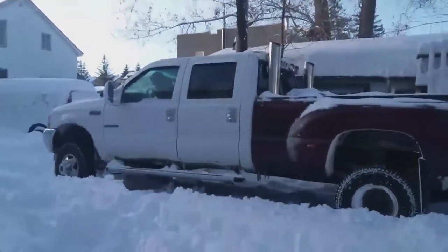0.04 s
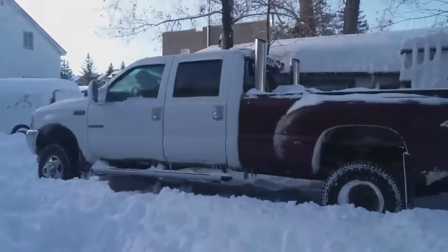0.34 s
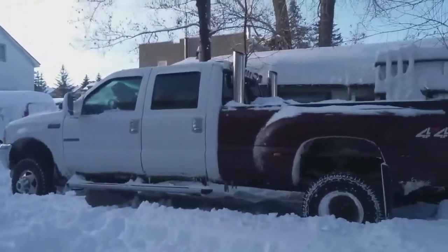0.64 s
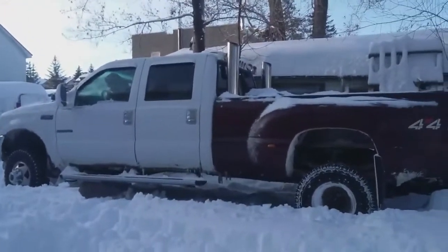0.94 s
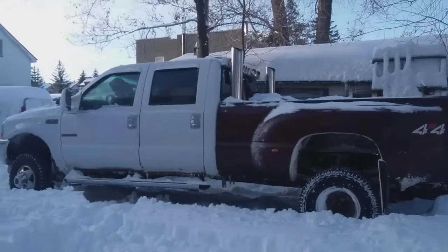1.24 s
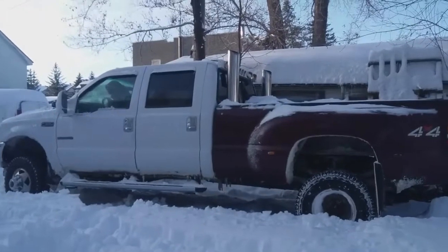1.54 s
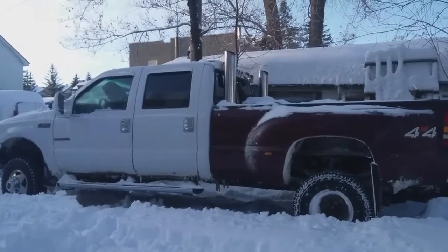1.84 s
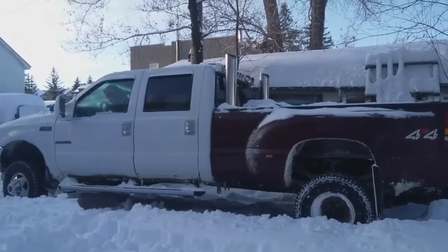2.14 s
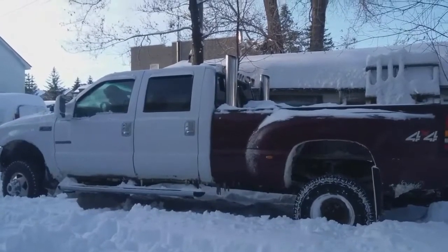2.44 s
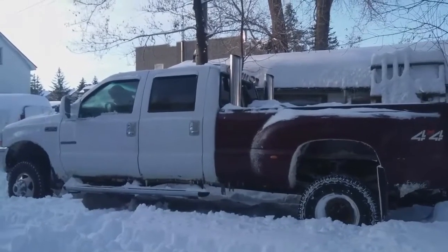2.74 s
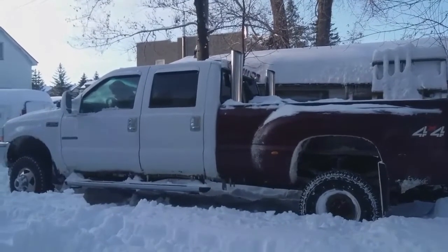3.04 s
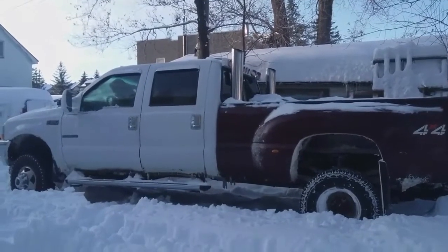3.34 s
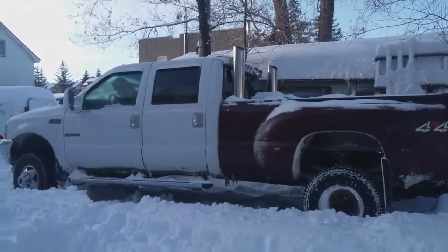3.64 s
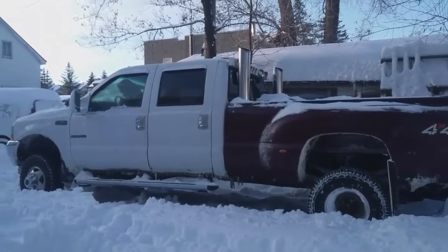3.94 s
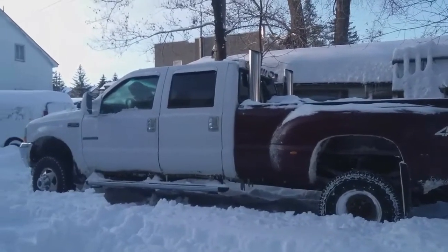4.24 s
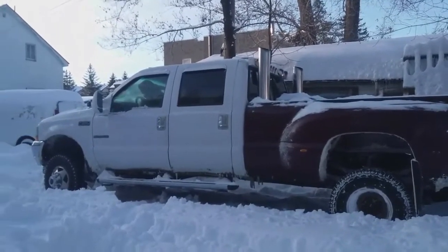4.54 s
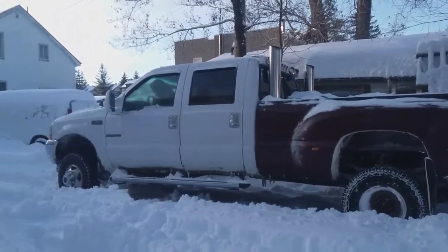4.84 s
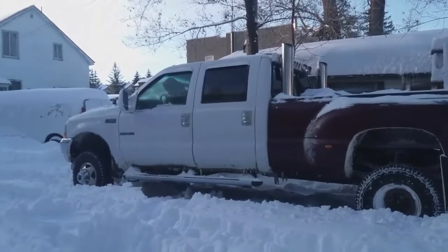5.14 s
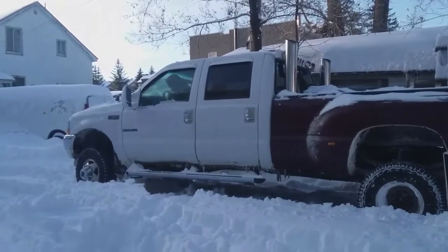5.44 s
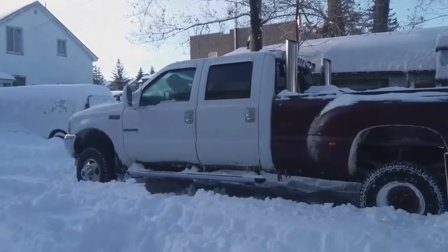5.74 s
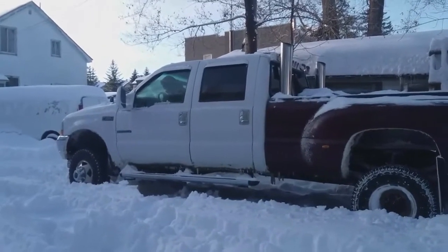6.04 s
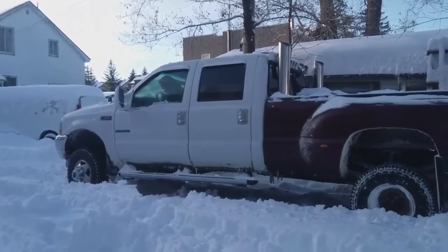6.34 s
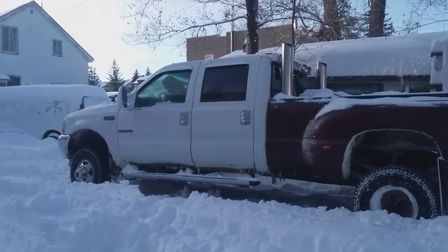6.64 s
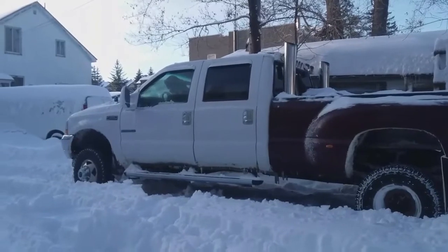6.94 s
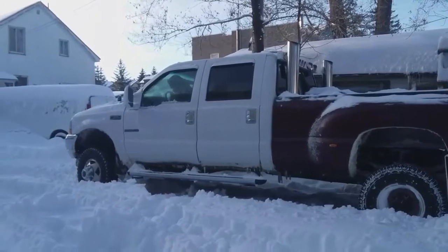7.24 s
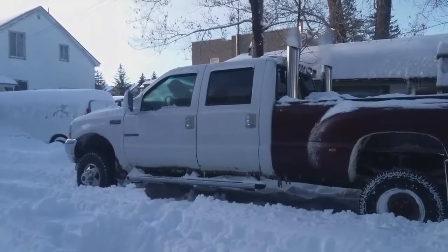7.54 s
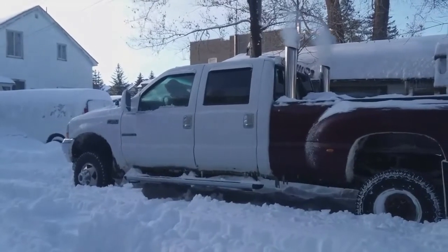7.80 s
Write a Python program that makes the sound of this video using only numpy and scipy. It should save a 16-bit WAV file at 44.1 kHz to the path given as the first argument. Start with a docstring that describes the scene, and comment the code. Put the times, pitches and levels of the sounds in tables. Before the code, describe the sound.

A cold diesel truck's starter labours and knocks for five seconds before the engine fires, booms briefly and dies.

```python
"""Cold diesel false start

A V8 diesel pickup with open exhaust stacks is cranked in a snowy yard. The starter's gear whine
sags on every compression while stray cylinders knock and rattle the block. After five seconds the
engine catches, surges twice with its firings booming through the stacks, stumbles and stalls."""
import sys
import numpy as np
from scipy import signal
from scipy.fft import rfft, irfft
from scipy.io import wavfile
from scipy.ndimage import uniform_filter1d

SR = 44100
rng = np.random.default_rng(int(sys.argv[2]) if len(sys.argv) > 2 else 0)


def log_audio(samples):
    """Write samples as a 16-bit WAV file to the path given in sys.argv[1]."""
    # one column per channel
    frames = np.atleast_2d(samples).T
    # limit to full scale, then quantise
    limited = np.clip(frames, -1, 1)
    pcm = np.round(limited * 32767).astype(np.int16)
    wavfile.write(sys.argv[1], SR, pcm)


N = 351468
T = np.arange(N) / SR
TAPS = 8192  # length of the impulse responses
CATCH_S = 5.42  # the engine takes over from the starter

# tone colours of winter air, gears, loose metal, combustion and gas: (frequency [Hz], level [dB])
AIR_SPECTRUM = [(25, -13), (70, 4), (350, -12.5), (800, -14.5), (1000, -8), (1300, -19.5), (2600, -17.5),
                (5000, -26), (6350, -16.5), (7700, -32.5), (13000, -32)]
RASP_SPECTRUM = [(100, -39.5), (280, -1), (600, -2), (1050, -2.5), (1300, -8), (2100, -16), (2650, -4.5),
                 (3300, -20), (4000, -16), (6600, -18.5), (8200, -34.5), (13000, -37)]
RATTLE_SPECTRUM = [(700, 10), (1400, -7), (1800, 7.5), (2600, 6.5), (3700, 2), (5300, 4), (6600, 2),
                   (8200, -14.5), (13000, -24.5)]
CLATTER_SPECTRUM = [(300, 7), (500, -3), (750, 10), (900, 6), (1080, -8), (1310, 5), (1600, -3.5),
                    (2200, -1.5), (2550, -8.5), (3100, -14.5), (9000, -35.5)]
HISS_SPECTRUM = [(1500, -2), (3000, -9.5), (3800, -2), (4500, -9), (5500, -0.5), (6500, 0), (7500, -13),
                 (9000, -22), (13000, -22.5)]
# resonances of starter housing, block, sump and stacks: (frequency [Hz], width [Hz], level [dB])
HOUSING_MODES = [(264.5, 51, 8), (472, 90, -6.5), (886, 30, 10.5), (1071, 54, -2.5), (2010, 40, 10),
                 (2550, 380, -0.5)]
BLOCK_MODES = [(709, 52, 9.9), (831, 15, 12), (895, 27, 14.7), (1078, 97, 6.3)]
SUMP_MODES = [(180, 60, -5.5), (297.7, 20, 2.5), (372, 32, 4), (462.5, 10.5, 6)]
STACK_MODES = [(57, 23, 5), (78.3, 61, 9), (96.2, 53, 4.5), (168.7, 6.7, 4.5), (232.4, 5.8, -1.5),
               (309.5, 21.4, -4.5), (339, 19.6, -2.5)]
# short rings of brackets, clutch and block: (frequency [Hz], pitch scatter [share], level [dB])
BRACKET_RINGS = [(1492, 0.13, 10), (2613, 0.0605, 10.5), (5280, 0.071, 5.5), (6360, 0.038, 0)]
CLUTCH_RINGS = [(4210, 0.082, 1), (5100, 0.093, 0.12), (6600, 0.025, -3)]
CLACK_RINGS = [(781, 0.12, -1.5), (1333, 0.122, 0), (2538, 0.092, -4)]
# compressions that load the starter: (time [s], whine level [dB], growl level [dB])
STROKES = [(0.048, -47, -41), (0.146, -41, -38.5), (0.304, -41, -39.5), (0.835, -41, -38),
           (1.119, -39.5, -37.5), (1.266, -40.5, -41), (1.64, -40.5, -39), (1.771, -41, -39.5),
           (2.05, -39.5, -39), (2.165, -45.5, -43), (2.31, -41.5, -39), (2.745, -42, -41.5),
           (2.865, -45, -43), (3.071, -41.5, -39.5), (3.206, -41.5, -43), (3.59, -43.5, -39.5),
           (3.69, -50, -40.5), (3.916, -49.5, -42.5), (4.03, -40.5, -40), (4.19, -40.5, -38.5),
           (4.48, -43, -41.5), (4.848, -51, -42.5)]
# tooth harmonics of the starter: (multiple, level [dB], peak after the stroke [s])
WHINE_PARTIALS = [(1, -10, .02), (2, -2, .006), (3, -6, .04), (4, 0, -.004)]
# swelling gear overtones: (multiple, level [dB], peak after the stroke [s], half-width [s])
HOWL_PARTIALS = [(2, -3.5, -.042, 0.024), (2, 1.5, 0.0117, 0.014), (2, -6, 0.087, .03),
                 (4, -15, -0.012, 0.04)]
# low hum while cranking: (time [s], pitch [Hz], level [dB], octave level [dB])
HUM_CURVE = [(0.19, 77, -61, -76.5), (2.78, 75.4, -54, -54), (3.46, 76.8, -53, -55.5),
             (4.15, 70.6, -58.5, -70), (4.55, 69.8, -73, -74)]
# lone cylinders firing against the starter: (time [s], block level [dB], thump level [dB])
KNOCKS = [(0.025, -46, -51), (0.479, -42.5, -51), (0.577, -45.5, -48.5), (0.668, -49.5, -53),
          (0.712, -45.5, -48), (0.984, -44, -48.5), (1.416, -43, -50.5), (1.478, -44, -48.5),
          (1.541, -41.5, -42.5), (1.934, -42, -46.5), (2.484, -46, -47.5), (2.609, -42.5, -47.5),
          (2.961, -46.5, -49), (3.367, -42.5, -48), (3.458, -46.5, -48.5), (3.53, -45, -41.5),
          (3.666, -43, -52.5), (3.808, -48, -47), (3.88, -42, -50), (4.318, -48, -47), (4.388, -47.5, -55),
          (4.611, -45, -49.5), (4.755, -50, -47.5), (4.818, -43.5, -47.5), (4.958, -45, -50.5),
          (5.043, -42.5, -50), (5.109, -40, -41), (5.16, -32.5, -36.5), (5.268, -44, -48.5),
          (5.362, -66, -65.5), (5.418, -40.5, -45), (5.625, -37.5, -49)]
# loose steel that a knock sets clanking: (frequency [Hz], level [dB])
CLANK_PARTIALS = [(925, 4.5), (1050, -6.5), (2550, -19.5)]
# a casing mode or a dry bearing sings out: (time [s], pitch [Hz], level [dB])
SQUEALS = [(0.384, 1040, -42.5), (1.12, 5370, -46), (1.257, 5450, -52), (2.715, 2560, -43),
           (2.874, 2550, -48), (3.065, 2510, -41.5), (3.289, 1036, -44), (3.677, 2495, -45),
           (4.475, 2400, -46), (4.839, 5400, -47), (6.548, 5580, -38.5)]
# runs of knocks in which the crank overtakes the starter: (start [s], end [s], level [dB])
OVERRUNS = [(0.475, 0.74, -54), (3.423, 3.615, -57), (4.896, 5.25, -57.5)]
# one sharp metal snap, contact and rebound: (time [s], level [dB], pitch [Hz], decay [s])
SNAP_CONTACTS = [(1.4487, -27, 2650, .001), (1.4488, -23, 5400, .0005), (1.4502, -25, 4100, .0027)]
# how hard the running engine burns: (time [s], level [dB])
EFFORT_CURVE = [(5.46, -43.5), (5.66, -34), (5.72, -44), (5.8, -32.5), (5.91, -34), (5.97, -27),
                (6.09, -30), (6.16, -22), (6.35, -27), (6.39, -35.5), (6.57, -34.5), (6.58, -28),
                (6.72, -29.5), (6.82, -22), (7.14, -47), (7.16, -39), (7.27, -33.5), (7.34, -40.5),
                (7.48, -76.5)]
# combustion clatter: (time [s], level [dB])
CLATTER_CURVE = [(5.45, -59), (5.85, -41.5), (6.27, -36), (6.41, -41.5), (6.56, -45), (6.77, -34.5),
                 (6.96, -37.5), (7.0, -46), (7.13, -54), (7.28, -41.5), (7.4, -74)]
# flares of unburnt fuel: (time [s], level [dB])
SPITS = [(5.427, -37), (6.274, -34), (6.305, -39.5), (6.76, -35), (7.21, -56)]
# firings that stand out of the running engine: (time [s], clack level [dB], boom level [dB])
HARD_FIRINGS = [(5.521, -34, -56), (5.8, -35.5, -24), (5.925, -45, -24.5), (6.431, -30.5, -43),
                (6.462, -37, -39), (6.485, -43, -26), (6.572, -28, -24), (6.686, -29.5, -39.5),
                (6.752, -34, -41), (6.842, -32, -25.5), (7.041, -41, -40.5), (7.08, -42.5, -63),
                (7.157, -37.5, -32)]


def undb(db):
    """Decibels to gain."""
    return np.exp(np.asarray(db) * (np.log(10) / 20))


def unit(x):
    """Scale to rms 1."""
    return x / np.sqrt(np.mean(x ** 2))


def around(start_s, end_s):
    """The samples between two times."""
    return slice(*np.searchsorted(T, [start_s, end_s]))


def bell(t, width_s):
    """Smooth hump that peaks at t = 0."""
    return np.exp(-(t / width_s) ** 2)


def held(start_s, end_s, attack_s, release_s):
    """Envelope that rises, holds and dies away."""
    return np.clip((T - start_s) / attack_s, 0, 1) * np.exp(-np.maximum(T - end_s, 0) / release_s)


def blows(times, levels_db, rise_s, decay_s):
    """One envelope per hit, summed: quick attack, exponential tail."""
    out = np.zeros(N)
    for s, db in zip(times, levels_db):
        near = around(s, s + 10 * decay_s)
        t = T[near] - s
        out[near] += undb(db) * (1 - np.exp(-t / rise_s)) * np.exp(-t / decay_s)
    return out


def knock_envelope(db, rise_s, decay_s):
    """An equal jolt at every knock."""
    return blows([s for s, _, _ in KNOCKS], np.full(len(KNOCKS), db), rise_s, decay_s)


def stroke_envelope(lag_s, width_s):
    """Load on the starter: a hump around each compression."""
    out = np.zeros(N)
    for s, _, _ in STROKES:
        near = around(s - .4, s + .4)
        out[near] += bell(T[near] - s - lag_s, width_s)
    return out


def drift(rate_hz):
    """Smooth random wander, rms 1."""
    step = int(SR / rate_hz)
    stairs = np.repeat(rng.standard_normal(N // step + 1), step)
    return unit(uniform_filter1d(stairs, step)[:N])


def grit(rate_hz, spread_db):
    """Noise with a flickering level, like dense small impacts."""
    return unit(rng.standard_normal(N) * undb(spread_db * drift(rate_hz)))


def through(x, response):
    """Filter by an impulse response scaled to unit energy."""
    response = np.float32(response / np.linalg.norm(response))
    return signal.oaconvolve(np.float32(x), response)[:N].astype(float)


def ring(x, modes):
    """Drive damped resonances; neighbours swing in opposite directions and take a moment to start."""
    t, response = T[:TAPS], np.zeros(TAPS)
    for k, (hz, width, db) in enumerate(modes):
        onset = (1 - np.exp(-2 * np.pi * hz * t)) ** 2
        decay = undb(db) * width * np.exp(-np.pi * width * t)
        response += (-1) ** k * onset * decay * np.cos(2 * np.pi * hz * t)
    return through(x, response)


def colour(x, spectrum):
    """Minimum-phase EQ in the shape of the spectrum."""
    hz, db = np.transpose(spectrum)
    bins_hz = np.maximum(np.arange(TAPS // 2 + 1) * SR / TAPS, 1)
    gain = undb(np.interp(np.log(bins_hz), np.log(hz), db))
    cepstrum = irfft(np.log(gain))
    return through(x, irfft(np.exp(rfft(2 * cepstrum[:TAPS // 2], TAPS))))


def chinks(modes, per_s, length_s, spread_db):
    """A shower of short, rough metal rings around each mode, each sagging a little in pitch; rms 1."""
    t = np.float32(T[:int(4 * length_s * SR)])
    shape = t * np.exp(-t / length_s * 2)
    out = np.zeros(N + len(t))
    count = int(per_s * N / SR)
    for hz, scatter, db in modes:
        late, pitch, size, sag = np.float32(rng.uniform(-1, 1, (4, count, 1)))
        phase = 2 * np.pi * hz * (1 + scatter * pitch) * t * (1 - (1 + sag) * t)
        rings = undb(db + spread_db * size) * shape * np.sin(phase)
        starts = (np.arange(count) + .5 + late[:, 0] / 2) * N / count
        for i, chink in zip(starts.astype(int), rings):
            out[i:i + len(t)] += chink
    return unit(out[:N] * (1 + .35 * drift(700)))


def yard_air():
    """A quiet bed of winter air with a thin high hiss."""
    return undb(-64) * colour(rng.standard_normal(N) * undb(.88 * drift(4.1)), AIR_SPECTRUM)


def starter_whine(slow_hz=175, swing_hz=108, lead_s=.00802, arc_s=.049, load_s=.044):
    """Pinion teeth mesh with the flywheel; the pitch arcs up and each compression drags it down."""
    wobble = 1 + .026 * drift(220)
    teeth, pressure = np.zeros((2, N))
    multiples, partial_db, peak_s = np.transpose(WHINE_PARTIALS)[:, :, None]
    draws = rng.uniform(-1, 1, (len(STROKES), 2 + len(WHINE_PARTIALS)))
    for (s, db, _), (start, depth, *bite) in zip(STROKES, draws):
        near = around(s - .15, s + .15)
        t = T[near] - s
        hz = slow_hz + swing_hz * (1 + .2 * depth) / (1 + ((t + lead_s) / arc_s) ** 2)
        phase = 2 * np.pi * (start + np.cumsum(hz * wobble[near]) / SR)
        loads = undb(db) * bell(t - peak_s, load_s)
        weights = undb(partial_db + 6.6 * np.array(bite)[:, None])  # a new colour on every stroke
        weights /= np.linalg.norm(weights)
        teeth[near] += np.sum(loads * weights * np.sin(multiples * phase), axis=0)
        pressure[near] += loads[-1]
    teeth *= undb(-2 + 2.5 * drift(200))
    scrape = colour(pressure * grit(390, .73), RATTLE_SPECTRUM)
    return teeth + undb(-11.5) * ring(teeth, HOUSING_MODES) + undb(-11) * scrape


def gear_groan(rest_hz=456, lift=.22, lead_s=.002, arc_s=.022, growl_lag_s=.047):
    """Under each compression a rough gear tone swoops up and back, howls and ends in a growl."""
    out, wobble = np.zeros(N), 1 + .034 * drift(260)
    multiples, partial_db, peak_s, width_s = np.transpose(HOWL_PARTIALS)[:, :, None]
    draws = rng.uniform(-1, 1, (len(STROKES), 3 + len(HOWL_PARTIALS)))
    for (s, whine_db, growl_db), (start, depth, pitch, *bite) in zip(STROKES, draws):
        near = around(s - .15, s + .15)
        t = T[near] - s
        arc = 1 + .03 * pitch + lift * (1 + .35 * depth) / (1 + ((t + lead_s) / arc_s) ** 2)
        phase = 2 * np.pi * (start + np.cumsum(rest_hz * arc * wobble[near]) / SR)
        swells = undb(whine_db + partial_db + 2 * np.array(bite)[:, None]) * bell(t - peak_s, width_s)
        growl = undb(growl_db - 1) * bell(t - growl_lag_s, .034) * np.sin(phase)
        out[near] += growl + np.sum(swells * np.sin(multiples * phase), axis=0)
    return out * undb(3 * drift(180))


def gear_rasp():
    """Turning gears rasp and ring the housing, louder around compressions and after knocks."""
    strokes = stroke_envelope(lag_s=.035, width_s=.29)
    kicks = knock_envelope(-54, rise_s=.011, decay_s=.11)
    load = np.sqrt(undb(-61) ** 2 + undb(-54) ** 2 * strokes + kicks ** 2)
    engaged = held(0, CATCH_S, attack_s=.0055, release_s=.065)
    rasp = colour(grit(350, 1) * load * engaged, RASP_SPECTRUM)
    return undb(-2) * rasp + undb(-16) * ring(rasp, HOUSING_MODES)


def loose_parts():
    """Brackets and covers chatter under each compression and after each knock."""
    shake = undb(-51) * stroke_envelope(lag_s=.0059, width_s=.052)
    shake += knock_envelope(-46, rise_s=.0046, decay_s=.028)
    return shake * chinks(BRACKET_RINGS, per_s=60, length_s=.008, spread_db=6)


def cranking_hum():
    """A low hum and its octave waver and throb while the engine is cranked."""
    times, hz, root_db, octave_db = np.transpose(HUM_CURVE)
    phase = 2 * np.pi * np.cumsum(np.interp(T, times, hz) * (1 + .035 * drift(25))) / SR
    root = undb(2.5 + np.interp(T, times, root_db)) * np.sin(phase)
    octave = undb(np.interp(T, times, octave_db)) * np.sin(2 * phase)
    throb = undb(2.5 * drift(16))
    return (root + octave) * throb * held(0, CATCH_S, attack_s=.1, release_s=.09)


def crank_lulls(depth=.58, lead_s=.011, width_s=.02):
    """Gain that ducks the gears as the crank nearly stops just before each knock."""
    gain = np.ones(N)
    for s, _, _ in KNOCKS:
        near = around(s - .1, s + .1)
        gain[near] *= 1 - depth * bell(T[near] - s + lead_s, width_s)
    return gain


def knocks(usual_db=-43):
    """A lone firing kicks the crank: parts slap in block and sump, with a clank and a bright rattle."""
    rises_s, lengths_s = (.0014, .004, .0035), (.055, .051, .057)  # block, sump, rattle
    drives, clank = np.zeros((3, N)), np.zeros(N)
    wobble = 1 + .012 * drift(400)
    draws = rng.standard_normal((len(KNOCKS), len(CLANK_PARTIALS), 2))
    for (s, block_db, thump_db), variations in zip(KNOCKS, draws):
        near = around(s, s + .25)
        t = T[near] - s
        # harder blows rattle more and are over sooner
        force_db = block_db - usual_db
        levels_db = block_db, thump_db, -46 + .83 * force_db
        stretch = np.clip(1 - (force_db - .5) / 12, .45, 1)
        for drive, db, rise_s, length_s in zip(drives, levels_db, rises_s, lengths_s):
            drive[near] += undb(db) * (1 - np.exp(-t / rise_s)) * bell(t, stretch * length_s)
        # the clank swells as the slack is taken up
        age = t / (stretch * .019)
        swell = undb(block_db - 1) * age * np.exp((1 - age ** 2) / 2)
        clock = np.cumsum(wobble[near]) / SR
        for (hz, db), (pitch, size) in zip(CLANK_PARTIALS, variations):
            clank[near] += swell * undb(db + size) * np.sin(2 * np.pi * hz * (1 + .015 * pitch) * clock)
    block = undb(-.5) * ring(drives[0] * grit(450, 2.5), BLOCK_MODES)
    sump = undb(4.5) * ring(drives[1] * grit(300, 1.8), SUMP_MODES)
    rattle = undb(-1.5) * colour(drives[2] * grit(450, 1.2), RATTLE_SPECTRUM)
    return block + sump + rattle + undb(2 * drift(250)) * clank


def kickback(top_hz=1520, fall_s=.05, length_s=.028):
    """Each knock flings the gears ahead: a yelp that dives as the starter takes up the load again."""
    out, wobble = np.zeros(N), 1 + .02 * drift(400)
    for (s, db, _), pitch in zip(KNOCKS, rng.uniform(.93, 1.05, len(KNOCKS))):
        near = around(s, s + 3 * length_s)
        t = T[near] - s
        hz = top_hz * pitch * wobble[near] / (1 + (t / fall_s) ** 2)
        phase = 2 * np.pi * np.cumsum(hz) / SR
        swell = undb(db - 5) * (1 - np.exp(-t / .004)) * bell(t, length_s)
        out[near] += swell * (np.sin(phase) + undb(-10) * np.sin(2 * phase))
    return out


def stack_puffs(hz=84, width_hz=63):
    """Each knock sends a low puff up the stacks."""
    times, _, thump_db = np.transpose(KNOCKS)
    envelope = blows(times, thump_db - 5, rise_s=.009, decay_s=.094)
    return ring(envelope * rng.standard_normal(N), [(hz, width_hz, 0)])


def squeals(cycles=45):
    """Casing or dry bearing sings in rough, sagging rings; the higher ones are over sooner."""
    out, wobble = np.zeros(N), 1 + .022 * drift(600)
    for s, hz, db in SQUEALS:
        near = around(s - .1, s + .1)
        t = T[near] - s
        phase = 2 * np.pi * np.cumsum(hz * (1 - t) * wobble[near]) / SR
        out[near] += undb(db) * bell(t, np.clip(cycles / hz, .012, .028)) * np.sin(phase)
    return out


def freewheel(zing_hz=5100, sag_hz_per_s=4000):
    """The outrun starter clutch zings downward; around the catch it spins with a hissing rattle."""
    rattle = undb(-53) * chinks(CLUTCH_RINGS, per_s=72, length_s=.006, spread_db=2)
    hiss = undb(-49) * colour(grit(120, 1.5), HISS_SPECTRUM)
    out = held(4.6, 6.34, attack_s=1, release_s=.11) * (hiss + rattle)
    rough = drift(1500)
    for start, end, db in OVERRUNS:
        near = around(start, end)
        t = T[near] - start
        zing = np.sin(2 * np.pi * np.cumsum(zing_hz - sag_hz_per_s * t) / SR)
        out[near] += undb(db) * signal.windows.tukey(len(t)) * rough[near] * zing
    return out


def ping(s, db, hz, decay_s):
    """A short damped ring."""
    return blows([s], [db], .00015, decay_s) * np.sin(2 * np.pi * hz * (T - s))


def metal_snap():
    """Metal strikes metal and rebounds in one sharp clack."""
    return sum(ping(*contact) for contact in SNAP_CONTACTS)


def exhaust(pulses, puffs, turns, effort_db, gas_share=.86):
    """Pressure pulses and puffs of gas boom through the stacks, whose mids bark under load."""
    boom = ring(gas_share * unit(puffs) - unit(pulses), STACK_MODES)
    boom = np.interp(T + .0009 * drift(16), T, boom)  # hot and cold gusts bend the resonances
    boom /= np.sqrt(uniform_filter1d(boom ** 2, SR // 14))  # even out the level
    boom *= undb(3 * np.sin(2 * np.pi * turns))  # the flow chugs with every firing
    # an open pipe radiates no deep bass
    boom = signal.sosfilt(signal.butter(4, 45, "high", fs=SR, output="sos"), boom)
    bark = signal.sosfiltfilt(signal.butter(2, [135, 270], "band", fs=SR, output="sos"), boom)
    return undb(-25 + .91 * effort_db) * (boom - bark) + undb(-20.5 + 1.24 * effort_db) * bark


def engine(slow_hz=20.93, surge_hz=33.75, full_effort_db=-23, puff_s=.021, slap_s=.02):
    """Each firing blows gas up the stacks and slaps the block; speed and exhaust ride the effort."""
    effort_db = np.interp(T, *np.transpose(EFFORT_CURVE)) - full_effort_db
    running = held(CATCH_S, EFFORT_CURVE[-1][0], attack_s=.055, release_s=.02)
    firing_hz = slow_hz + surge_hz * undb(.7 * effort_db)
    firing_hz *= np.exp(.2 * (1 - firing_hz / 60) * drift(45))  # the slower, the more uneven
    turns = np.cumsum(firing_hz) / SR  # one per firing
    firing = turns.astype(int)
    age_s = (turns - firing) / firing_hz
    size = undb(3 * rng.standard_normal(1000))[firing]
    pulses = np.diff(firing, prepend=0) * size
    puffs = size * np.exp(-age_s / puff_s) * rng.standard_normal(N)
    stacks = running * exhaust(pulses, puffs, turns, effort_db)
    tail = np.exp(-age_s / slap_s)
    clatter_db = np.interp(T, *np.transpose(CLATTER_CURVE))
    slap = running * undb(clatter_db) * unit(.15 + np.sqrt(size) * tail)
    clatter = undb(2) * colour(slap * grit(450, .51), CLATTER_SPECTRUM)
    clack = undb(-3) * slap * chinks(CLACK_RINGS, per_s=85, length_s=.006, spread_db=3.5)
    jet = unit(1 + tail) * grit(300, .76)
    hiss = colour(running * undb(-39 + .96 * effort_db) * jet, HISS_SPECTRUM)
    return stacks + clatter + clack + hiss


def fuel_spits():
    """Unburnt fuel flares and spits short hisses of gas from the stacks."""
    bursts = blows(*np.transpose(SPITS), rise_s=.001, decay_s=.037)
    return colour(bursts * rng.standard_normal(N), HISS_SPECTRUM)


def hard_firings(boom_hz=68):
    """A late, heavy charge clacks in the block and booms at the low note of the stacks."""
    times, clack_db, boom_db = np.transpose(HARD_FIRINGS)
    hits = blows(times, clack_db, rise_s=.0016, decay_s=.018)
    clatter = undb(-2.5) * colour(hits * grit(500, .78), CLATTER_SPECTRUM)
    clack = undb(-1) * hits * chinks(CLACK_RINGS, per_s=60, length_s=.013, spread_db=-2.5)
    note = np.sin(2 * np.pi * np.cumsum(boom_hz * (1 + .17 * drift(90))) / SR)
    boom = undb(4.5) * blows(times, boom_db, rise_s=.0106, decay_s=.052) * note
    return clatter + clack + boom


def last_puff():
    """One soft, low pop leaves the stacks after the stall."""
    return ping(s=7.638, db=-55, hz=140, decay_s=.022)


def scene():
    """The truck, its echo and the yard in mono."""
    gears = crank_lulls() * (starter_whine() + gear_groan() + gear_rasp() + loose_parts())
    cranking = gears + knocks() + kickback() + cranking_hum() + stack_puffs() + freewheel()
    truck = cranking + engine() + hard_firings() + fuel_spits() + squeals() + metal_snap() + last_puff()
    # snow swallows most reflections; the house walls return a short tail
    t = T[:TAPS]
    walls = through(truck, rng.standard_normal(TAPS) * np.exp(-t / .017) * (t > .012))
    return (truck + undb(-9.5) * walls + yard_air())[None]


def record(dry):
    """Roll off the deepest bass and cut the top steeply."""
    thin = signal.sosfilt(signal.butter(3, 40, "high", fs=SR, output="sos"), dry)
    return signal.sosfilt(signal.ellip(10, .2, 70, 13100, fs=SR, output="sos"), thin)


dry = scene()
out = record(dry)
log_audio(out)
```